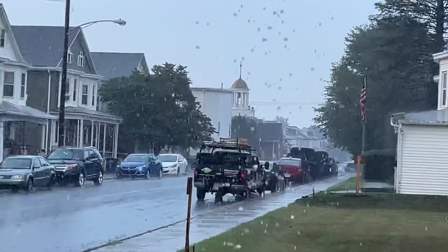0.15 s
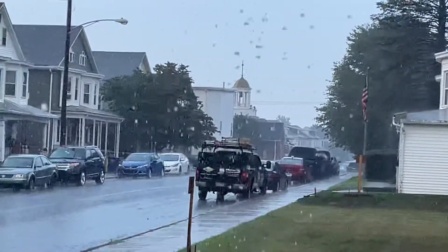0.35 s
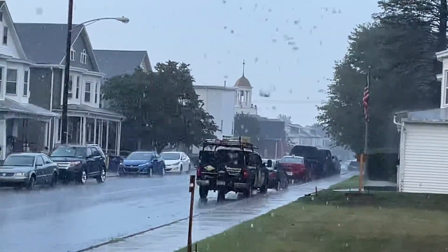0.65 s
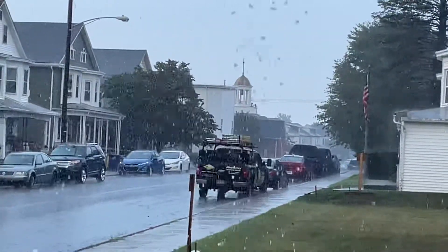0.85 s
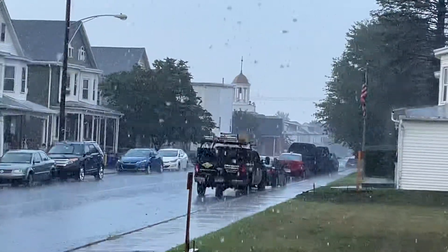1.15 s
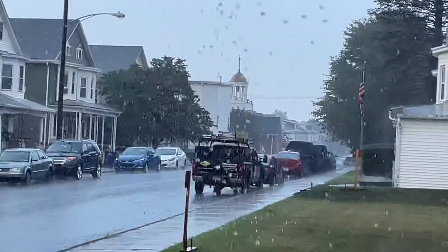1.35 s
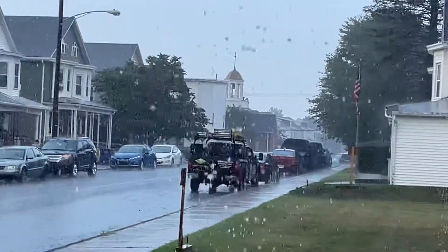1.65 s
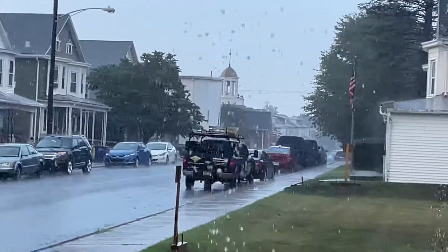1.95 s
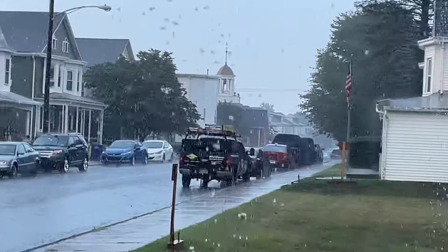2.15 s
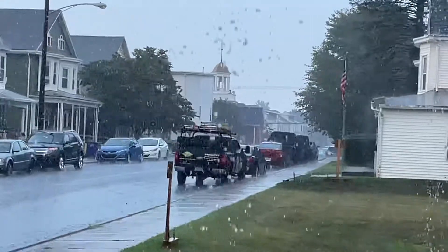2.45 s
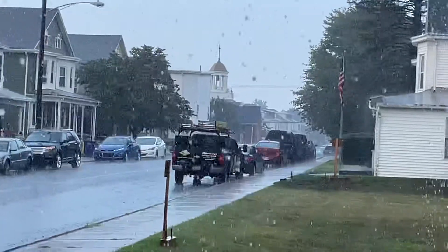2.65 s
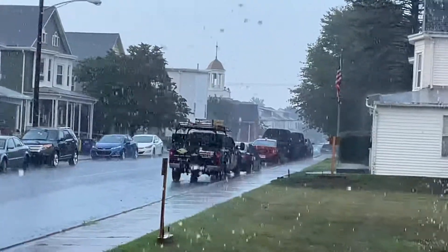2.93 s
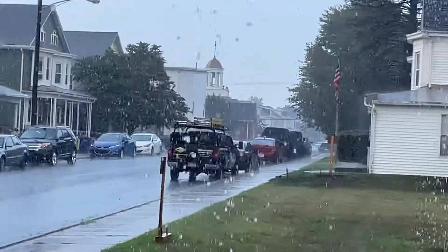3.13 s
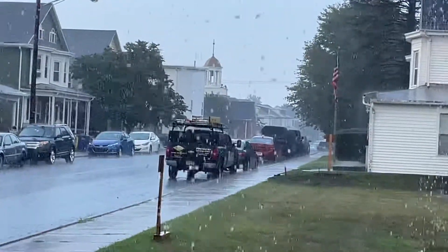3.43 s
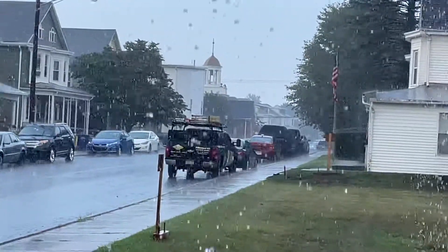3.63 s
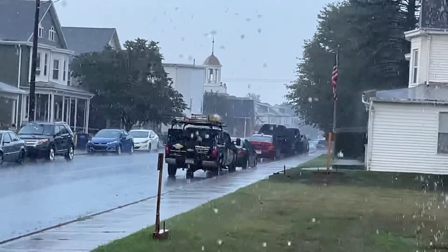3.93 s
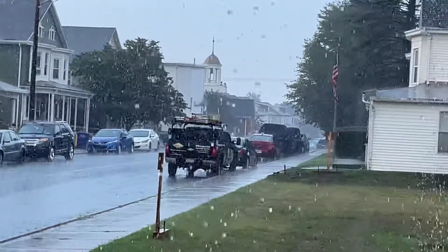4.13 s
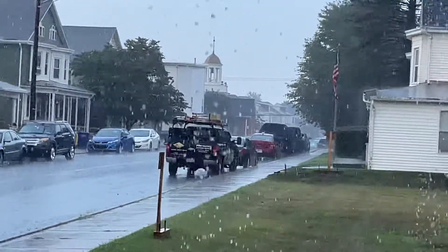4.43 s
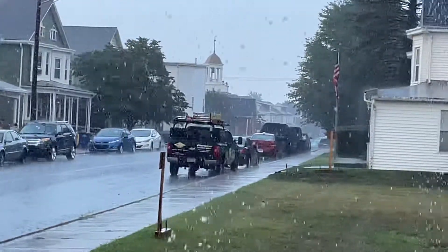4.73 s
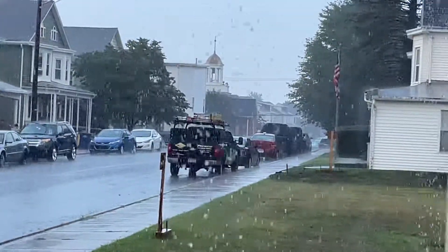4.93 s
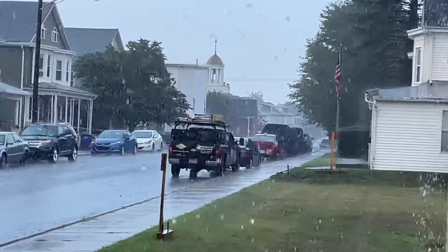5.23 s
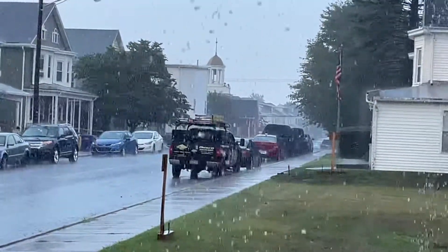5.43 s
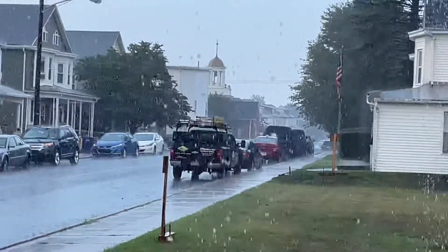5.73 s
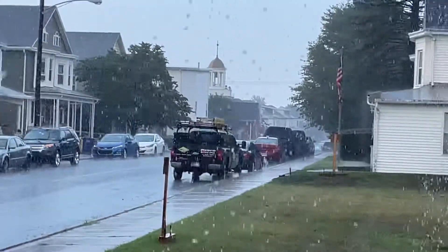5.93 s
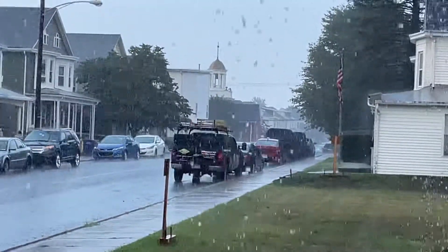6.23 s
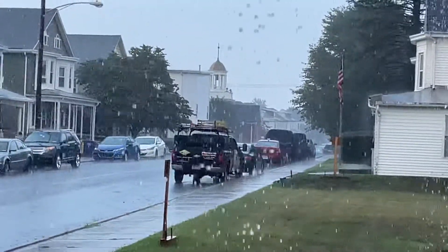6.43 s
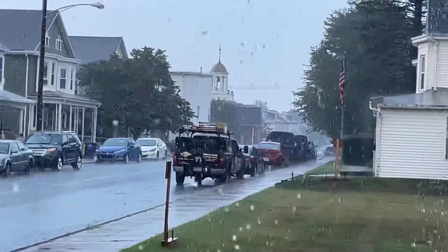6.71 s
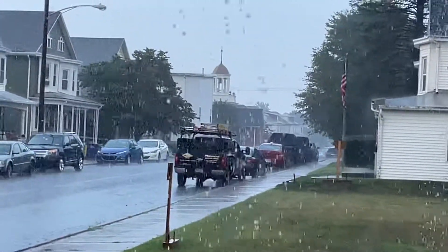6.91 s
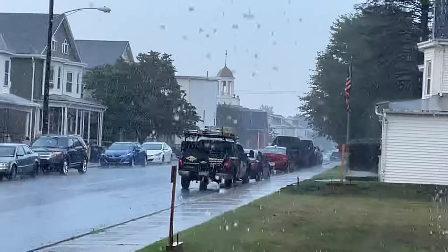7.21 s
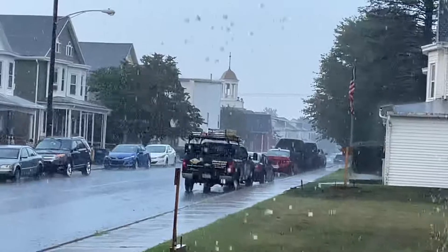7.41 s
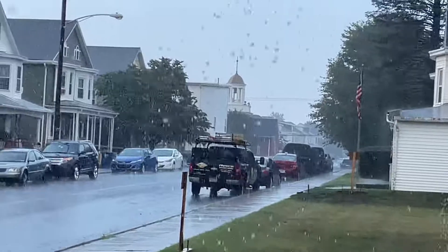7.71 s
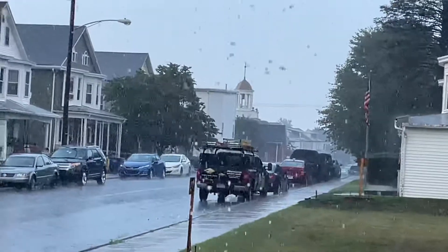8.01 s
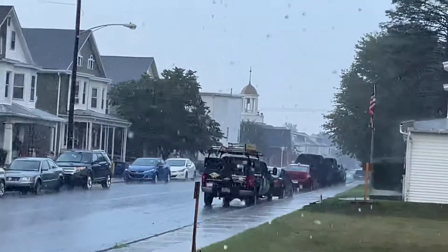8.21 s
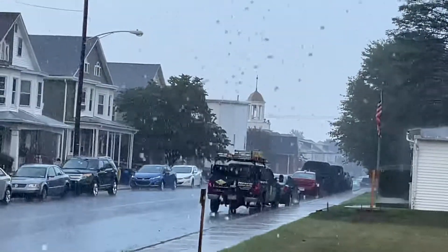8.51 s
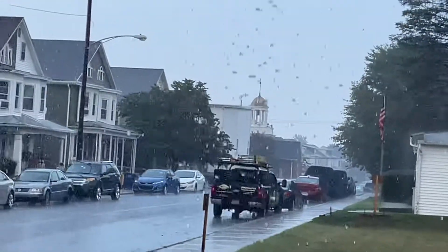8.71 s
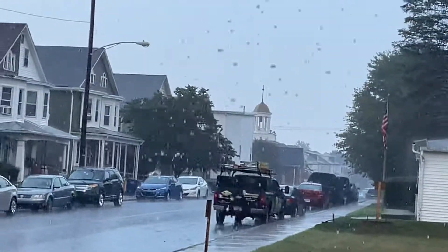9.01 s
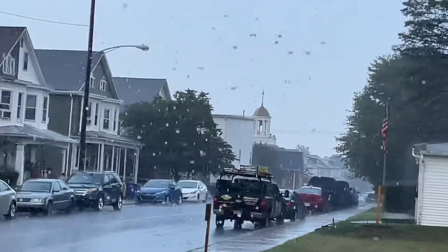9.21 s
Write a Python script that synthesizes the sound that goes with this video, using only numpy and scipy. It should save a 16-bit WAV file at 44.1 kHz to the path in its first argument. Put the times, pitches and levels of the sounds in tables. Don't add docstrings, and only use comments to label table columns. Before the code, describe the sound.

Continuous heavy rain for about 9.4 seconds, heard close up from under a porch facing a wet street. The far rain is a steady, wide, slightly flickering hiss without gusts, over quiet low street rumble. Dense patter and fine dry pricks sit nearer. Big drips fall irregularly throughout, ticking woody on boards, bright on stone and dull in a puddle, with tiny splashes and sharp spray. Two soft bass bumps come at 0.1 and 0.6 s. A low, unsteady distant engine revs up from the start to about 3.5 s, then fades into a faint cruising hum. Drips cluster strongly around 1.9-2.1 s and again from 4 to 5.5 s; strong single ones land near 3.4, 6.9 and 7.4 s. A hollow lid gives brief low plops at 0.7, 7.05 and 7.4 s. Rain continues unchanged to the end.

```python
import sys
import numpy as np
from scipy import signal
from scipy.fft import rfft, irfft, next_fast_len
from scipy.io import wavfile
from scipy.ndimage import uniform_filter1d

SR = 44100
rng = np.random.default_rng(int(sys.argv[2]) if len(sys.argv) > 2 else 0)


def gain_from_decibels(decibels):
    exponent = np.asarray(decibels, float) / 20
    return 10 ** exponent


def unload_audio(sound):
    columns = np.transpose(np.atleast_2d(sound))
    steps = np.round(np.clip(columns, -1, 1) * 32767)
    wavfile.write(sys.argv[1], SR, steps.astype(np.int16))


N = 412776
RAIN_DB = -36


def evened(x):
    return x / np.sqrt(np.mean(x ** 2) + 1e-20)


def read(points, hz):
    f, value = np.transpose(points)
    return np.interp(np.log(hz + 1), np.log(f + 1), value)


def curve(rows, column):
    rows = np.array(rows)
    return np.interp(np.arange(N) / SR, rows[:, 0], rows[:, column])


def drift(seconds):
    hop = 128
    size = round(seconds * SR / hop)
    coarse = rng.standard_normal(N // hop + 2)
    for _ in range(2):
        coarse = uniform_filter1d(coarse, size=size)
    return np.interp(np.arange(N) / hop, np.arange(len(coarse)), evened(coarse))


def add(mix, s, sound):
    part = mix[round(s * SR):][:len(sound)]
    part += sound[:len(part)]


# (frequency [Hz], likeness [0-1])
LIKENESS = [(200, 0.97), (500, 0.29), (1000, 0.46), (1750, 0.093), (2300, 0.8), (2900, .92), (3500, 1),
            (6000, .9), (8000, 0.9), (16000, .86)]


def field(spectrum, size, patchy_db, flicker_db):
    hop = size // 4
    frames, hz = N // hop + 5, np.fft.rfftfreq(size, 1 / SR)
    a, b, c, d, patches = rng.standard_normal((frames, len(hz), 5)).T
    patches = uniform_filter1d(patches, size=10, axis=0)
    patches = evened(uniform_filter1d(patches, size=12, axis=1))
    flicker = evened(uniform_filter1d(rng.standard_normal(frames), size=4))
    treble = np.clip(hz / 3000, .4, 1)[:, None]
    same = np.clip(read(LIKENESS, hz), -1, 1)[:, None]
    left = a + 1j * b
    right = same * left + np.sqrt(1 - same ** 2) * (c + 1j * d)
    level_db = read(spectrum, hz)[:, None] + treble * (patchy_db * patches + flicker_db * flicker)
    z = np.array([left, right]) * gain_from_decibels(level_db)
    return evened(signal.istft(z, nperseg=size, noverlap=size - hop)[1][:, :N])


# (frequency [Hz], density [dB per Hz])
WASH = [(70, -12.5), (250, -2.5), (500, -1.5), (1000, -4.5), (1400, -6), (1900, -4), (2500, -7),
        (4000, -10.5), (5500, -9), (8000, -9), (10200, -13), (13000, -19), (14500, -16), (15700, -17)]


def far_rain():
    return gain_from_decibels(RAIN_DB + 2.5) * field(WASH, size=512, patchy_db=1.26, flicker_db=1.49)


# (frequency [Hz], density [dB per Hz])
RUMBLE = [(25, -35), (40, -13.5), (62, 2), (85, -2), (120, -5), (200, -6), (320, -11.5), (500, -60)]


def street_rumble():
    mean_db, gust_db, gust_s = -42.5, 1, 0.19
    gusts = gain_from_decibels(mean_db + gust_db * drift(gust_s))
    return gusts * field(RUMBLE, size=4096, patchy_db=0, flicker_db=0)


def tick(hz, bright_db, body_db, chance, cycles=0.63):
    t = np.arange(len(chance)) / SR - .0009
    swell = np.exp(-.5 * (t * hz / cycles) ** 2 * np.where(t < 0, 1.6, 1))
    ring = np.cos(2 * np.pi * hz * t * (1 + 150 * t) + chance[0]) * swell
    burst = chance * np.exp(-abs(t) / 0.0011)
    grit = 0.072 * np.convolve(burst, np.sin(2 * np.pi * hz * np.arange(12) / SR), "same")
    snap = np.diff(chance * np.exp(-abs(t) / 0.00034), 2, prepend=[0, 0]) / 2
    knock = np.cos(2 * np.pi * 2700 * t + chance[1]) * np.exp(-.5 * (t / 0.00019) ** 2)
    return ring + grit + gain_from_decibels(bright_db) * snap + gain_from_decibels(body_db) * knock


def patter(per_s, spread_db):
    pitches_hz = np.geomspace(2800, 9500, 24)
    shapes = np.array([tick(hz, -1, -14.5, rng.standard_normal(160)) for hz in pitches_hz])
    when, big, sign, kind = rng.random((round(per_s * N / SR), 4)).T
    size = gain_from_decibels(spread_db * np.minimum(-np.log(1 - big), 3)) * np.sign(sign - .5)
    at = (when * N).astype(int)[:, None] + np.arange(shapes.shape[1])
    drops = size[:, None] * shapes[(kind * len(shapes)).astype(int)]
    return evened(np.bincount(at.ravel(), drops.ravel(), N)[:N])


def pricks(per_s, spread_db):
    size = gain_from_decibels(spread_db * np.minimum(rng.exponential(1, N), 3)) * (rng.random(N) < per_s / SR)
    t = np.arange(40) / SR
    swing = np.sin(2 * np.pi * 4800 * t) * np.exp(-t / 0.00017)
    return evened(np.convolve(size * rng.choice([-1., 1.], N), swing)[:N])


# (time [s], firing rate [Hz], level [dB], lean from first order to second [dB])
ENGINE = [(0.0, 50.96, -47, 2), (0.4, 51.46, -47.5, -2), (0.75, 53, -47.5, -4), (1.0, 54.54, -46, 8),
          (1.35, 57.53, -48, 3.5), (1.55, 59.5, -46, -1), (1.9, 61, -45, -3), (2.2, 67, -53, -10),
          (2.7, 73, -47.5, -0.5), (3.15, 76.4, -45.5, -1), (3.7, 78, -58, -5), (4.3, 70, -51, -1.5),
          (5.4, 74, -53, 6), (6.0, 70, -54, -5), (7.0, 74, -58.5, -5), (8.3, 68, -57, -4),
          (9.36, 66, -57, -3)]
# (order [x firing rate], level re engine [dB])
SIDE_ORDERS = [(1.5, -5.5), (5, -7.5)]


def engine():
    turns = np.cumsum(curve(ENGINE, 1) * (1 + 0.02425 * drift(0.051))) / SR
    lean_db = curve(ENGINE, 3)
    hum = np.zeros(N)
    for order, db in [(1, -lean_db), (2, lean_db)] + SIDE_ORDERS:
        hum += gain_from_decibels(db + 2.8 * drift(0.049)) * np.sin(2 * np.pi * order * turns)
    return np.sqrt(2) * gain_from_decibels(curve(ENGINE, 2)) * hum


# (time [s], peak level [dB], frequency [Hz])
BUMPS = [
    (0.08, -29, 60),
    (0.568, -27, 100),
]


def bumps():
    out, t = np.zeros(N), np.arange(-3000, 3000) / SR
    for s, db, hz in BUMPS:
        add(out, s + t[0], gain_from_decibels(db) * np.cos(2 * np.pi * hz * t) * np.exp(-.5 * (t / 0.011) ** 2))
    return out


def surface_drips(rows, snap_db, knock_db, splash_db):
    usual_db, splash_lag = -23, .45
    out, t = np.zeros(N), np.arange(900) / SR
    for (s, db, hz), draw in zip(rows, rng.standard_normal((len(rows), 1100))):
        blow = tick(hz, snap_db, knock_db, draw[:200])
        add(out, s + 0.00018, gain_from_decibels(db) * blow)
        envelope = np.clip(t / 0.0033 - .6, 0, 2) * np.exp(-t / 0.0052)
        droplets = draw[200:] ** 3 * envelope
        droplet = np.diff(blow[10:90]) * SR / (2 * np.pi * hz)
        splash = np.convolve(droplets / np.linalg.norm(droplets), droplet)
        add(out, s, gain_from_decibels(db + splash_db - splash_lag * (db - usual_db)) * splash)
    return out


# (time [s], peak level [dB], ring [Hz])
AFTERS = [(0.2284, -26, 3820), (0.5097, -23, 6000), (2.2574, -23, 4910), (3.8029, -18, 2990),
          (4.0013, -20, 4170), (4.2694, -24, 4130), (4.3024, -16, 6550), (4.4754, -21, 5130),
          (4.5574, -26, 3670), (4.6764, -25, 5770), (6.766, -15, 4100), (6.8823, -17, 6260),
          (7.205, -21, 3990), (7.434, -19, 3630), (7.7997, -26, 4390), (8.02, -28, 5880),
          (8.3873, -31, 5400), (8.9401, -20, 6270), (9.3422, -21, 4530), (0.2774, -25, 4630),
          (1.5489, -24, 3490), (1.6926, -24, 3480), (3.2958, -19, 3344), (3.6012, -21, 4110),
          (4.6243, -21, 4050), (5.256, -22, 3110), (5.3627, -18.5, 5500), (7.8735, -24, 3820),
          (8.4268, -26, 4340), (8.837, -24, 4900)]


def after_drips():
    out = np.zeros(N)
    for (s, db, hz), draw in zip(AFTERS, rng.standard_normal((len(AFTERS), 200))):
        add(out, s + 0.00026, gain_from_decibels(db) * tick(hz, -6.5, -23, draw))
    return out


# (time [s], peak level [dB])
GLINTS = [(0.2994, -8.5), (0.888, -15.5), (1.0101, -29), (2.0877, -4.5), (2.515, -11), (2.8647, -11),
          (3.172, -30), (3.405, -11), (3.57, -19), (3.911, -11), (4.0462, -15), (4.086, -14), (4.8209, -13),
          (4.9297, -31), (5.0619, -15), (5.4001, -10), (5.537, -15), (5.5834, -11), (5.67, -15.5),
          (5.7149, -14), (6.394, -7), (6.937, -27), (7.017, -14), (7.1407, -16), (7.2705, -18),
          (7.677, -13.5), (7.7764, -29), (8.0436, -28), (8.275, -14), (9.207, -19)]


def glints():
    out, t = np.zeros(N), np.arange(60) / SR
    for (s, db), draw in zip(GLINTS, rng.standard_normal((len(GLINTS), 60))):
        add(out, s + 0.00061, gain_from_decibels(db) * np.diff(draw * np.exp(-t / 0.0007)) / 2)
    return out


# (time [s], peak level [dB], ring [Hz])
ON_BOARDS = [(0.7264, -28, 4420), (1.2296, -25, 3690), (1.585, -19.5, 3900), (1.738, -18, 3990),
             (1.8928, -8, 4810), (1.9633, -15.5, 3890), (2.068, -14.5, 4070), (2.1031, -10.5, 4200),
             (2.1276, -21, 4060), (2.2752, -15.5, 5540), (2.4451, -21, 5470), (2.7067, -21, 5550),
             (2.9431, -14, 3700), (4.8547, -16, 3200), (4.8843, -19, 4230), (5.0598, -18.5, 4000),
             (5.1766, -16, 4300), (5.233, -19.5, 4050), (5.3088, -20.5, 3420), (5.9733, -21, 5820),
             (6.263, -30, 4680), (6.3744, -18, 6680), (7.2983, -17.5, 5350), (7.4235, -20, 4070),
             (7.9302, -25, 3270), (8.2736, -19, 4630), (8.334, -20, 3400), (8.5849, -22, 4600),
             (8.737, -17.5, 4460)]
# (time [s], peak level [dB], ring [Hz])
ON_STONE = [(1.0098, -15.5, 4620), (2.3193, -20.5, 4330), (2.5143, -19, 4000), (2.8601, -27, 3186),
            (3.1731, -16, 5040), (3.3794, -17, 5700), (3.71, -18.5, 5650), (4.0457, -26, 4040),
            (4.0931, -23, 4580), (4.289, -21.5, 4400), (4.544, -16.5, 4600), (4.6043, -20, 4360),
            (4.9287, -17, 4950), (4.9851, -19.5, 4680), (5.7139, -18.5, 4520), (5.7698, -16.5, 3920),
            (6.148, -32, 3360), (6.3926, -18, 4350), (6.4313, -22, 4160), (6.8094, -18, 5400),
            (6.9376, -12.5, 4630), (7.014, -21, 4470), (7.2714, -17, 5360), (7.676, -17, 4830),
            (7.7747, -15, 2980), (8.0464, -20, 4750), (8.535, -20, 4450), (8.6208, -22, 5190),
            (8.9107, -16, 5300), (9.198, -19, 3320)]
# (time [s], peak level [dB], ring [Hz])
IN_PUDDLE = [(0.289, -13, 5030), (1.0562, -19, 5000), (1.279, -20, 3140), (1.3357, -12, 4230),
             (1.6182, -18, 4485), (2.0877, -10.5, 3920), (2.368, -19.5, 3680), (2.834, -16, 4590),
             (3.0208, -19, 5180), (3.271, -19.5, 3290), (3.4054, -10, 5000), (4.3345, -20, 3053),
             (4.4775, -10, 5000), (4.6483, -21, 4600), (4.8209, -9.5, 6810), (5.0477, -19, 2970),
             (5.1535, -16.5, 6270), (5.9369, -14, 5360), (6.032, -24, 5840), (7.0993, -14, 5270),
             (7.2417, -21, 4530), (7.3953, -10, 4490), (7.5108, -17, 4740), (7.5522, -19, 5200),
             (7.63, -19.5, 4030), (8.177, -23, 4930), (8.6686, -18, 4200), (8.8005, -16, 4850),
             (9.0242, -15, 3715), (9.2968, -25.5, 6370)]


def drips():
    out = surface_drips(ON_BOARDS, snap_db=-12, knock_db=-4, splash_db=-9)
    out += surface_drips(ON_STONE, snap_db=-3, knock_db=-24, splash_db=-9)
    out += surface_drips(IN_PUDDLE, snap_db=-14, knock_db=-24, splash_db=-7)
    return out + after_drips() + glints()


# (time [s], peak level [dB], ring [Hz], upper ring [ratio], upper level [dB])
PLOPS = [
    (0.666, -27, 1480, 1.03, -1),
    (7.053, -27.5, 1094, 1.5, -10),
    (7.43, -22.5, 1050, 1.86, -2),
]


def lid():
    out, t = np.zeros(N), np.arange(900) / SR
    for s, db, hz, ratio, upper_db in PLOPS:
        lower = np.sin(2 * np.pi * hz * t)
        upper = np.sin(2 * np.pi * ratio * hz * t) + 0.39 * np.sin(2 * np.pi * 1.38 * hz * t)
        add(out, s, gain_from_decibels(db - 60 * t / 0.019) * (lower + gain_from_decibels(upper_db) * upper))
    return out


# (delay [s], level [dB])
ECHOES = [(.0023, -6), (.0036, -11), (.0068, -15), (.0105, -17)]


def porch(x):
    early = np.zeros(600)
    early[0] = 1
    for s, db in ECHOES:
        early[round(s * SR)] += gain_from_decibels(db)
    out = signal.oaconvolve(x, early)[:N]
    ahead = 300
    t = (np.arange(2200) - ahead) / SR
    turn = np.pi * np.arange(N) / SR * 7
    fade = gain_from_decibels(-60 * np.where(t > 0, t / 0.09, -t / 0.022))
    for k in range(3):
        spray = rng.standard_normal(len(t)) * (rng.random(len(t)) < .15) * fade
        spray /= np.linalg.norm(spray)
        share = np.sqrt(2 / 3) * np.cos(turn + k * np.pi / 3)
        out += gain_from_decibels(-11) * signal.oaconvolve(x * share, spray)[ahead:ahead + N]
    return out


def scene():
    rain = gain_from_decibels(RAIN_DB)
    far = far_rain()
    drops = drips() * gain_from_decibels(1.5)
    drops += rain * gain_from_decibels(-8.0) * patter(per_s=500, spread_db=8.0)
    drops += rain * gain_from_decibels(-9.5) * patter(per_s=60, spread_db=2.5)
    small = signal.butter(3, [1800, 12500], "bandpass", fs=SR, output="sos")
    near = porch(signal.sosfilt(small, drops) + lid())
    fine = signal.sosfilt(small, rain * gain_from_decibels(-9.0) * pricks(per_s=150, spread_db=2.5))
    return near + fine + far + street_rumble() + engine() + bumps()


# (frequency [Hz], lead [rad])
LEAD = [(0, 0), (780, 1.0), (1460, -.25), (2400, .2), (3000, .45), (4000, .3), (5600, -.3), (6300, -.5),
        (7000, -1.15), (7600, -2.3), (8270, -3.14), (8960, -3.95), (10300, -5.45), (11600, -6.28),
        (12700, -7.3), (13200, -8.4), (13800, -8.9), (16500, -10.35)]
# (frequency [Hz], level [dB])
TILT = [(60, -1.5), (200, -3), (400, 0), (700, 1), (1300, -0.5), (1900, 2.5), (2600, 1), (3500, 1),
        (16000, -1)]


def two_ports(dry):
    size = next_fast_len(N + 4096)
    hz = np.fft.rfftfreq(size, 1 / SR)
    half = gain_from_decibels(read(TILT, hz) / 2) * np.exp(.5j * np.interp(hz, *np.transpose(LEAD)))
    return irfft(rfft(dry, size) * np.array([half, 1 / half]), size)[:, :N]


BANDS = [132, 144, 160, 176, 196, 216, 240, 264, 292, *range(320, 737, 32)]


def thin(ports, weak_db, waver_db, attack_db):
    lead_in = 772
    pair = np.array([ports[0] + ports[1], ports[0] - ports[1]]) / 2
    pair = np.pad(pair, ((0, 0), (lead_in, 0)))
    frame = dict(window=signal.windows.cosine(2048), nperseg=2048, noverlap=1024)
    z = signal.stft(pair, **frame)[2]
    frames = z.shape[2]
    bright = np.pad((np.diff(pair, 2) ** 2).sum(0), (512, 4096))
    bright = bright[:frames * 1024].reshape(frames, 8, 128).mean(2)
    sharpness_db = 10 * np.log10(bright.max(1) / (np.median(bright, 1) + 1e-12) + 1e-12)
    calm = sharpness_db < attack_db
    budget = rng.standard_normal(frames)
    for lo, hi in zip(BANDS, BANDS[1:]):
        power = (abs(z[:, lo:hi]) ** 2).sum(1)
        limit_db = weak_db + waver_db * (.6 * budget + .8 * rng.standard_normal(frames))
        weak = power < gain_from_decibels(2 * limit_db) * power[::-1]
        z[:, lo:hi] *= 1 - (calm & weak)[:, None]
    z[:, 732:] *= gain_from_decibels(-7.0) * (sharpness_db > attack_db + 5.0)
    z[:, 770:] = 0
    mid, side = signal.istft(z, **frame)[1][:, lead_in:lead_in + N]
    return np.array([mid + side, mid - side])


def roll_off(x):
    return signal.sosfilt(signal.butter(12, 16840, fs=SR, output="sos"), x)


def record(dry):
    mix = thin(two_ports(dry), weak_db=-7.0, waver_db=1.5, attack_db=5.5)
    return roll_off(mix)


dry = scene()
out = record(dry)
unload_audio(out)
```